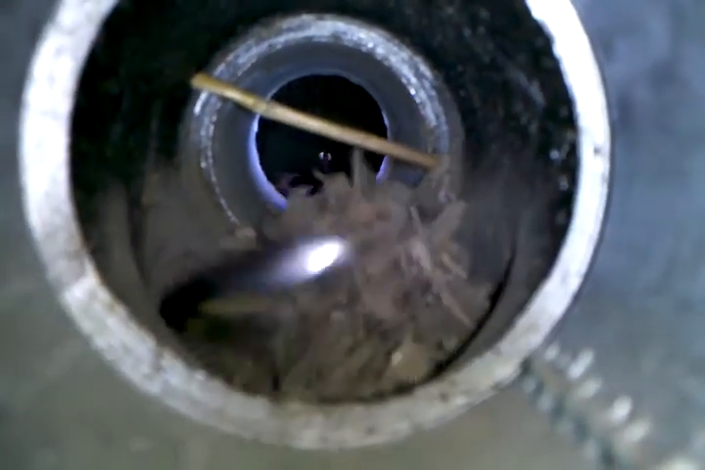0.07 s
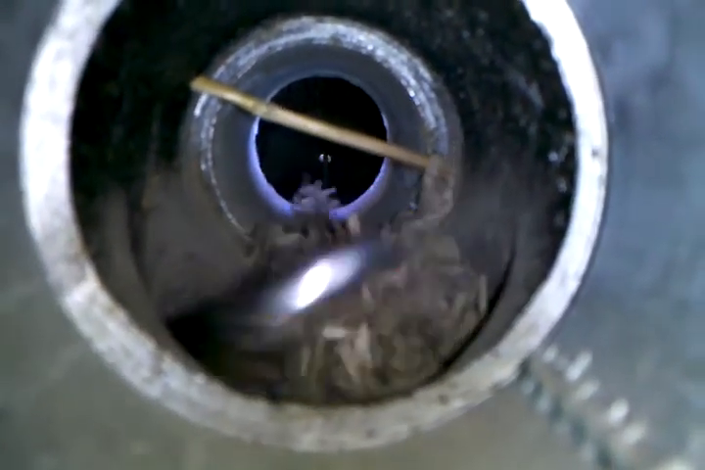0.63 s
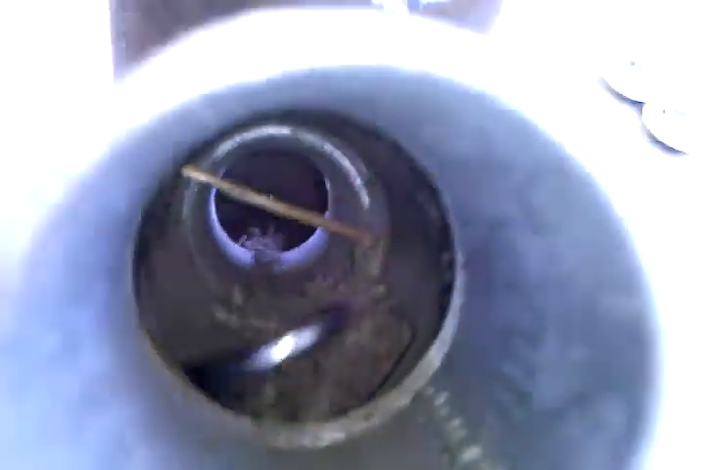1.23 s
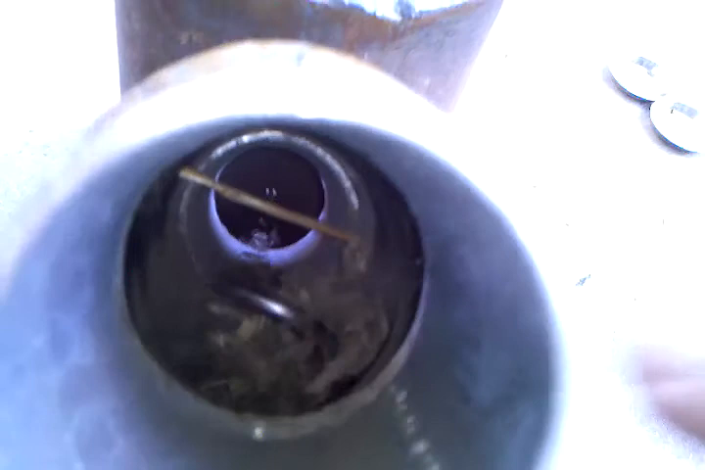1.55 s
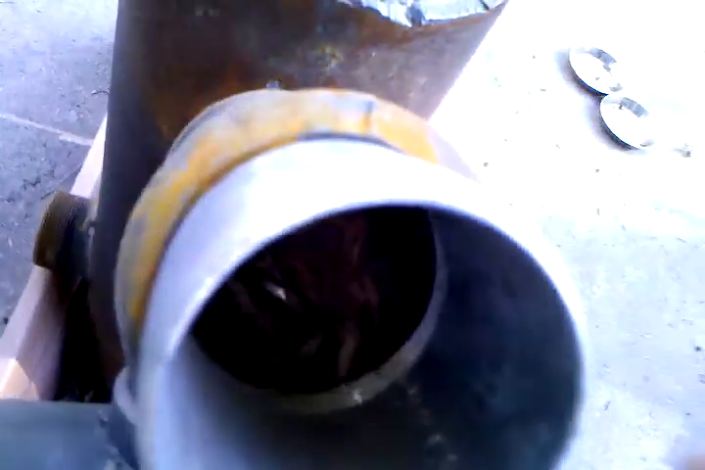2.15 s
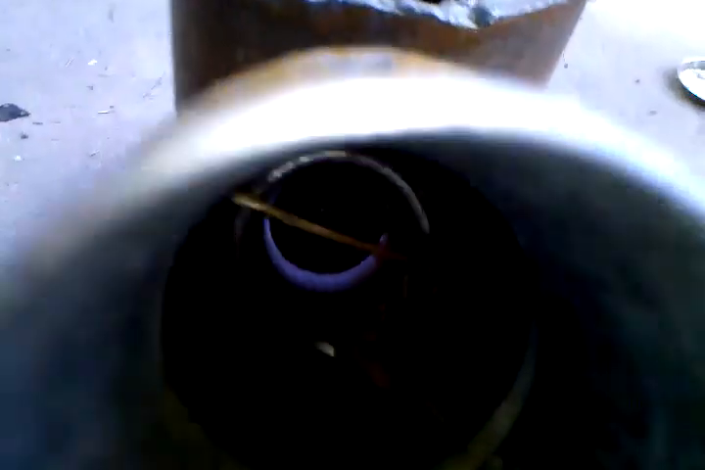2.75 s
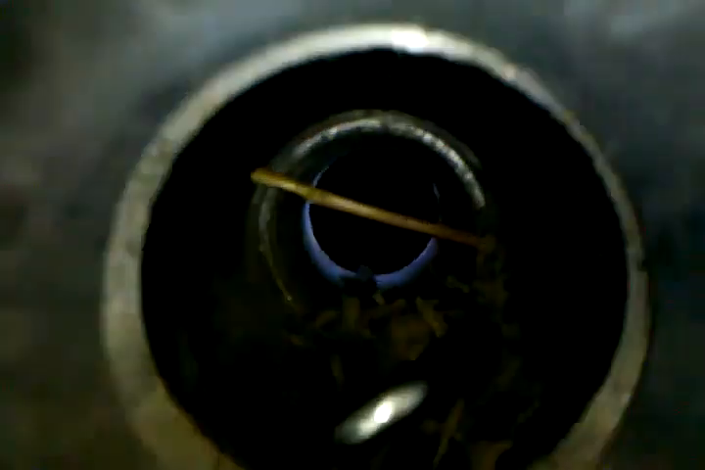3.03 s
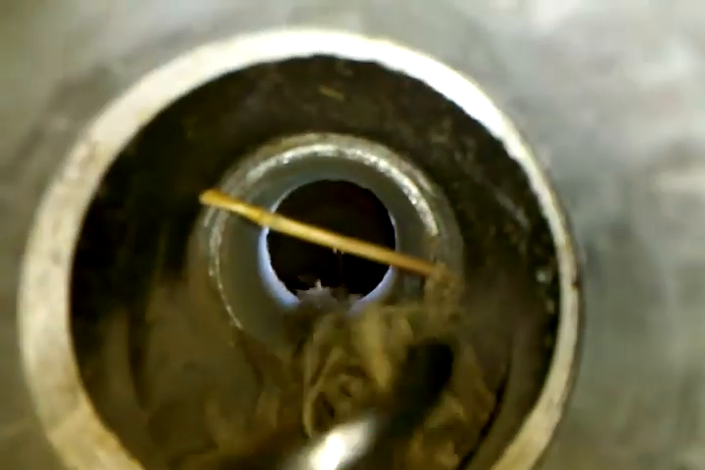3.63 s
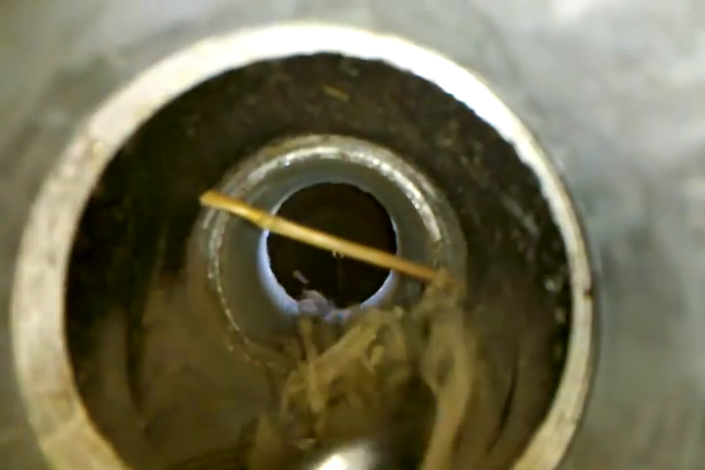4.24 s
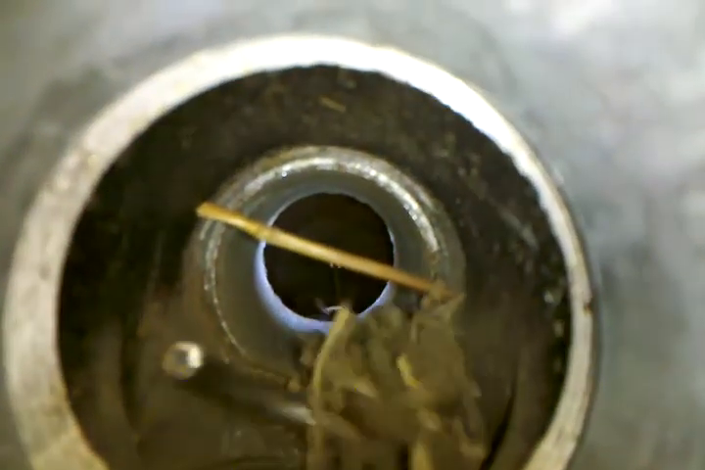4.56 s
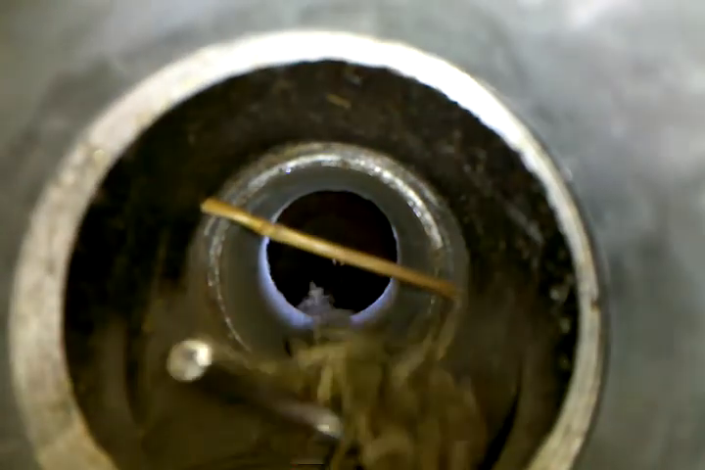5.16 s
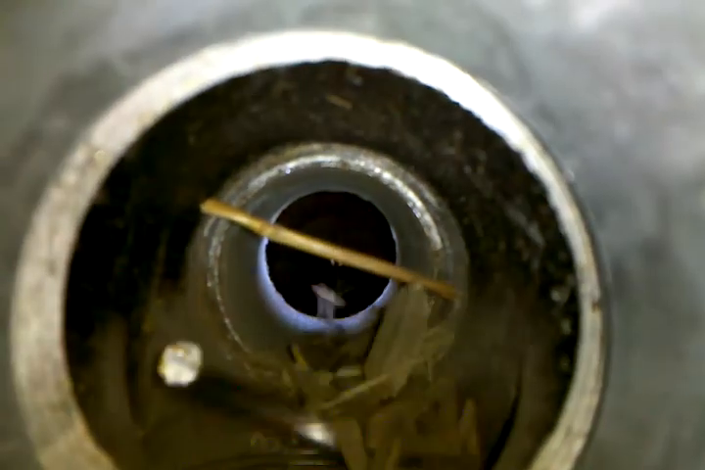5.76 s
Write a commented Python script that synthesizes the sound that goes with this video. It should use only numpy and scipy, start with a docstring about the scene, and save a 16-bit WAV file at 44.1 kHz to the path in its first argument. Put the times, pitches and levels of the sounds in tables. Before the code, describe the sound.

A coil auger turns in a steel pipe for about six seconds, heard through a small microphone at the open end with little high treble. Its hollow rumble and scrape run throughout, swelling gently about every 0.6 seconds, over a very faint motor hum. Wood chips grind, rustle and tink against the wall, and many snap with a short crunch and a brief metallic ring. A strong crack comes at 0.7 seconds, followed by a dull bump. From about 1.5 to 3 seconds the grinding is quieter, with smaller snaps near 2 and 2.4 seconds. After a sharp tick at 3.1 seconds it builds again, with dull knocks near 3.2, 3.9, 4.7 and 5.2 seconds, a cluster of tinks around 4.1 and a tiny rising squeak at 4.6. The loudest ringing snap lands at 5.1 seconds, and another follows at 5.7 as the grinding continues.

```python
"""A coil auger turns in a steel feed pipe, pushing wood chips toward a small microphone at the open end.
The coil rumbles and bumps on the pipe wall, swelling once a turn and sounding the air in the pipe.
The chips grind, rustle and tink on the steel, and one squeaks. Now and then a chip jams and snaps:
a short crunch, and coil and pipe ring. The motor hums faintly behind it all."""
import sys
import numpy as np
from scipy import signal
from scipy.fft import rfft, irfft
from scipy.io import wavfile

SR = 44100
rng = np.random.default_rng(int(sys.argv[2]) if len(sys.argv) > 2 else 0)


def persist_wave(psi):
    """Save psi, clipped to +-1, as 16-bit WAV."""
    counts = np.round(np.clip(psi, -1, 1) * 32767).astype(np.int16)
    wavfile.write(sys.argv[1], SR, np.atleast_2d(counts).T)


N = 259749
TIME = np.arange(N) / SR


# the coil's scraping, weaker while the pipe mouth is farther away: (time [s], relative level [dB])
COIL_LEVEL = [(0.06, -42), (0.33, -45), (0.83, -44.5), (1.32, -43.5), (1.48, -52.5), (1.98, -49),
              (2.09, -54), (3.05, -50.5), (3.27, -42), (3.83, -40), (3.98, -49), (4.2, -40.5), (4.46, -41),
              (4.78, -37), (5.43, -42), (5.8, -40.5)]
# spectra of the low rumble and the hollow scraping at the pipe mouth: (frequency [Hz], gain [dB])
RUMBLE_SPECTRUM = [(25, -50), (55, -26), (76, -13), (105, -13.5), (135, -6), (165, -3.5), (260, 3),
                   (330, -1), (420, -12), (700, -23)]
HOLLOW_SPECTRUM = [(200, -29.5), (320, -20), (400, -0.5), (520, 6), (640, 3.5), (760, -1), (950, -11),
                   (1300, -18.5), (2500, -53)]

def coil_rumble(turn_s=0.621, first_press_s=0.082):
    """The coil judders and scrapes along the wall, pressing hardest once a turn; the air resounds."""
    coil_db = swing(COIL_LEVEL)
    press = np.cos(2 * np.pi * (TIME - first_press_s) / turn_s)
    judder = grains(per_s=1400, spread_db=4) * from_db(2.3 * drift(14))
    scrape = grains(per_s=2500, spread_db=3) * from_db(1.3 * drift(22))
    rumble = rms_one(pipe_air(colour(judder, RUMBLE_SPECTRUM), resonance_db=9))
    hollow = rms_one(pipe_air(colour(scrape, HOLLOW_SPECTRUM), resonance_db=2.5))
    rumble_db = -48 + 1.47 + 0.24 * coil_db + 2 * press
    hollow_db = -43.5 + 0.13 + coil_db + 1.5 * press
    return from_db(rumble_db) * rumble + from_db(hollow_db) * hollow


# the coil's heavier bumps against the pipe: (time [s], relative level [dB], pitch [Hz])
BUMPS = [(0.84, -24.5, 435), (2.645, -29.5, 297), (3.069, -27, 276), (3.232, -21.5, 224),
         (3.899, -23.5, 466), (4.012, -30.5, 376), (4.336, -29.5, 230), (4.688, -20.5, 653),
         (4.754, -27.5, 383), (5.197, -21, 516), (5.848, -27, 400)]
# spectrum of a dull knock inside the pipe: (frequency [Hz], gain [dB])
THUD_SPECTRUM = [(30, -49.5), (70, -36.5), (120, -15.5), (190, -1), (320, -1), (520, 3.5), (720, -4),
                 (950, -14), (1500, -9.5), (3000, -33.5)]

def coil_bumps():
    """The coil drops against the chip-padded wall: a few low cycles and a soft scuff."""
    tone, scuff = np.zeros((2, N))
    t = TIME[:SR // 6]
    faint_bumps = strays(COIL_LEVEL, level_db=-38.5, low_hz=233, high_hz=674, count=8)
    for s, level_db, hz in BUMPS + faint_bumps:
        thump = ring(t, hz, t60=0.054, rise=0.00076)
        add(tone, s, from_db(level_db + 3) * resonate(thump, hz, width=hz))   # padded: near one pitch
        add(scuff, s, from_db(level_db - 10) * burst(t, length=0.0084, t60=0.16, rise=0.0024))
    return tone + pipe_air(colour(scuff, THUD_SPECTRUM), resonance_db=-1)


# flow of chips along the wall, heard as their rustle: (time [s], relative level [dB])
CHIP_FLOW = [(0.12, -47), (0.98, -44.5), (1.46, -50), (2.08, -54), (2.24, -52), (2.9, -51.5), (3.49, -45.5),
             (3.65, -43), (3.82, -51), (4.08, -46.5), (4.25, -40.5), (4.56, -45.5), (4.78, -39.5),
             (4.94, -42), (5.11, -52), (5.32, -44.5), (5.71, -49.5), (5.85, -44.5)]
# spectra of chips crushing and of chips sliding: (frequency [Hz], gain [dB])
GRIND_SPECTRUM = [(500, -25), (950, -8), (1260, -9), (1420, -3.5), (1660, 4), (1900, -0.5), (2150, -5),
                  (2330, -4), (2800, -5.5), (3100, -2.5), (3600, -12), (5000, -20)]
RUSTLE_SPECTRUM = [(1500, -31.5), (2800, -14.5), (3600, -2.5), (4300, 0), (5200, -1), (5900, -2),
                   (6600, 4.5), (7500, -7)]
# modes of the steel pipe: (frequency [Hz])
PIPE_HZ = [680, 1260, 1630, 1925, 2380, 2630, 3050, 3146, 3271, 3353, 3811, 3905, 4018, 4280, 4570, 4764,
           4894, 5470, 5630, 5785, 6195, 6590]
# how each of those modes rings: (t60 [s], gain when struck [dB], gain when rubbed [dB])
PIPE_RING = [(0.11, -5.5, -22.5), (0.026, -12, -6.5), (0.014, -4, -18), (0.05, -12, -11.5),
             (.04, -22, -17.5), (0.071, -6.5, -6), (0.06, -0.5, 1), (0.12, -6, -2), (0.039, 2.5, -9),
             (0.12, -8, -12), (.085, -8.5, -14), (0.056, -13, -18), (0.12, -11, -2.5), (0.087, -4, 1),
             (0.078, -12.5, -18), (0.036, -8, -22.5), (0.047, -8, -17), (0.056, -11.5, -15),
             (0.05, -19.5, -24.5), (0.085, -17.5, -12.5), (0.07, -19, -11.5), (0.18, -19, -19)]
COIL_HZ, COIL_T60_S = 4996, 0.062   # the coil's own ring

def sliding_chips():
    """Chips crush, slide and flick in small clumps; their contacts keep the steel faintly ringing."""
    flow_db = swing(CHIP_FLOW)
    clumps_db = 1.2 * drift(20)
    grind_db = -45.5 + 0.33 * swing(COIL_LEVEL) + 0.22 * flow_db + clumps_db
    rustle_db = -43 + flow_db + clumps_db
    flicks = from_db(3.5) * chip_flicks()
    tinks = chip_tinks()
    grind = (grains(per_s=6000, spread_db=4.5) + 0.35 * flicks) * from_db(grind_db - 2.67)
    rustle = (grains(per_s=9000, spread_db=4) + flicks) * from_db(rustle_db - 2.23)
    rubbing = (grains(per_s=2000, spread_db=0) + flicks) * from_db((grind_db + rustle_db) / 2)
    steel = from_db(-5.5) * resonate(rubbing, COIL_HZ, mode_width(COIL_T60_S))
    for hz, (t60, _, rubbed_db) in zip(PIPE_HZ, PIPE_RING):
        grip = from_db(3.2 * drift(4.5))   # a mode swells as chips slide over its antinodes
        contacts = rubbing * grip + from_db(-5.5) * tinks
        steel += from_db(rubbed_db) * resonate(contacts, hz, mode_width(t60))
    wood = colour(grind, GRIND_SPECTRUM) + colour(rustle, RUSTLE_SPECTRUM) + tinks
    return pipe_wall(wood) + from_db(16) * steel


# chips that jam and snap: (time [s], relative level [dB], length of the break [s],
# thud trim [dB], crunch trim [dB], coil ring trim [dB], chip pitch [Hz])
SNAPS = [(0.0423, -25, .0033, -21, -13, -13, 4550), (0.0852, -27, 0.0047, -16, -1.5, -1, 4950),
         (0.7422, -14, 0.0062, -6, -4, 0, 5450), (0.8325, -25.5, 0.0058, 1, -6.5, -2, 2940),
         (1.3014, -27, 0.0071, -17, -2, 5, 4870), (1.4311, -37.5, 0.0099, 2, -2.5, -3, 3100),
         (1.5424, -32.5, 0.0022, -20, -4, -20, 3450), (2.0163, -24, .0043, -30, -5.5, -19, 3460),
         (2.0403, -27.5, 0.0033, -3.5, -8.5, -16, 4160), (2.0604, -36.5, 0.0077, -3, -5.5, 1, 3250),
         (2.134, -43.5, 0.0023, -21, 4, -10, 4700), (2.382, -35.5, 0.0028, 1.5, -6, -10, 6540),
         (2.4377, -23, 0.0035, -5.5, 0.5, -8, 3060), (2.4618, -44, 0.0063, 15, 16.5, -14, 3240),
         (2.5775, -31, 0.0039, -25, -6.5, -7, 3400), (2.7691, -36.5, 0.0039, 1.5, 2.5, -14, 4000),
         (3.0694, -18, 0.0025, -11.5, -15, -21, 5800), (3.0814, -30, 0.0034, -10, -18, -20, 5200),
         (3.163, -35, .0033, -14, -17, -14, 6070), (3.1802, -23.5, .006, -9, -12.5, -18, 3500),
         (3.2834, -25, 0.00651, -5.5, -5.5, -18, 3300), (3.7778, -25, 0.0088, -3, -0.5, -13, 3950),
         (4.3939, -30, 0.0078, 1, -11, -17, 2920), (4.5146, -21.5, 0.0046, 1, -7.5, -28, 3040),
         (4.565, -25, 0.0056, -6, -10, -3, 3950), (4.8085, -18.5, .0035, -5, -8.5, -29, 4480),
         (5.0868, -8, 0.0084, -13, -7, 2.5, 3240), (5.234, -36.5, .009, 4, -2, 5.5, 5160),
         (5.3657, -35, 0.0033, -4, -1.5, -4, 4360), (5.6333, -38, .0065, -8, -14, -13, 4280),
         (5.6934, -16, 0.0069, -7, -9, -10, 3020), (5.8022, -35.5, .008, 4.5, 0, -14, 4520)]
# spectrum of cracking wood: (frequency [Hz], gain [dB])
CRACK_SPECTRUM = [(1000, -21.5), (2300, -11.5), (3000, -4), (3600, -2), (4400, 1), (5700, 0), (6700, 0.5),
                  (8000, -9.5)]

def chip_snaps(wind_up_s=0.004):
    """A chip breaks with a tick, crack, crunch and thud; the freed coil slaps the pipe and both ring."""
    thud, crunch, crack, steel = np.zeros((4, N))
    t = TIME[:SR // 4]
    touch = 1 + from_db(-60 * t / 0.046)   # the ring is strongest while the parts touch
    for s, level_db, length, thud_db, crunch_db, coil_db, chip_hz in SNAPS:
        fibres = from_db(level_db - 4) * burst(t, length, t60=0.047, rise=0.00025)
        tick = from_db(level_db + 3.5) * burst(t, length=0.00027, t60=0.01, rise=0.0001)
        add(crack, s, tick + fibres + from_db(4.5) * resonate(fibres, chip_hz, width=330))
        add(crunch, s, from_db(level_db + crunch_db - 1) * burst(t, length, t60=0.056, rise=0.00065))
        add(thud, s, from_db(level_db + thud_db - 6) * burst(t, length, t60=0.093, rise=0.0017))
        # a chip that holds longer than wind_up_s winds up the coil for a hard slap
        slap = from_db(level_db - 3) / (1 + (wind_up_s / length) ** 6)
        for hz, (t60, struck_db, _) in zip(PIPE_HZ, PIPE_RING):
            nearness_db = 6.3 * np.exp(-((hz - chip_hz) / 450) ** 2)   # lifts modes near the chip's pitch
            strength = slap * from_db(struck_db + nearness_db + rng.normal(0, 1.5))
            add(steel, s + 0.55 * length, strength * touch * ring(t, hz, t60, rise=0.0016))
        coil_ring = ring(t, COIL_HZ, COIL_T60_S, rise=0.0077)
        add(steel, s + 0.6 * length, from_db(level_db + coil_db + 10.5) * coil_ring)
    low = pipe_air(colour(thud, THUD_SPECTRUM), resonance_db=6.5)
    bright = pipe_wall(colour(crunch, GRIND_SPECTRUM) + colour(crack, CRACK_SPECTRUM))
    return low + bright + steel


# the louder chips that catch on the steel: (time [s], relative level [dB], pitch [Hz])
TINKS = [(0.328, -31.5, 3230), (0.9969, -26, 4280), (1.0455, -30, 4370), (1.1048, -27.5, 2993),
         (1.6878, -30, 4160), (2.3476, -32, 4320), (3.4994, -28, 4340), (4.0982, -22, 4290),
         (4.149, -23, 3140), (4.1868, -27, 3220)]

def chip_tinks():
    """A chip catches on the steel and chatters briefly at its own pitch."""
    out, t = np.zeros(N), TIME[:SR // 8]
    faint_tinks = strays(CHIP_FLOW, level_db=-36.5, low_hz=3130, high_hz=4300, count=8)
    for s, level_db, hz in TINKS + faint_tinks:
        scrape = from_db(level_db - 9.5) * burst(t, length=0.0066, t60=0.081, rise=0.00051)
        add(out, s, from_db(-1.5) * colour(scrape, CRACK_SPECTRUM))
        add(out, s, from_db(14.5) * resonate(scrape, hz, width=45))
    return out


def chip_flicks(per_s=16, t60=0.015):
    """Loose chips flick against the wall: short puffs of uneven strength."""
    hits = rng.uniform(0.3, 1, N) * (rng.random(N) < per_s / SR)
    envelope = signal.lfilter([1], [1, -from_db(-60 / (t60 * SR))], hits + 1e-18)
    return envelope * rng.standard_normal(N)


def chip_squeak(start=4.594, length=0.034, from_hz=5200, to_hz=5950, level_db=-37):
    """A chip slips along the steel with a thin rising squeak."""
    hz = np.interp(TIME, [start, start + length], [from_hz, to_hz]) * (1 + 0.0087 * drift(200))
    swell = np.sin(np.pi * np.clip((TIME - start) / length, 0, 1))
    return from_db(level_db) * swell * np.sin(2 * np.pi * np.cumsum(hz) / SR)


# resonances of the air in the pipe, heard at its mouth: (frequency [Hz], width [Hz], gain [dB])
AIR_MODES = [(204.7, 16.3, -8), (377, 11, -3), (438, 35, -5), (523.5, 30, -6.5), (583, 23, -3),
             (689.6, 14.2, 2.5)]

def pipe_air(x, resonance_db):
    """The air column lifts its own pitches out of a low sound."""
    column = sum(from_db(db) * resonate(x, hz, width) for hz, width, db in AIR_MODES)
    return x + from_db(resonance_db) * column


def pipe_wall(x, lift_db=3, width=55):
    """A sound inside the pipe reaches the mouth lifted at each of the wall's modes."""
    for hz in PIPE_HZ:
        x = x + (from_db(lift_db) - 1) * resonate(x, hz, width)
    return x


def motor_hum(hum_hz=120, level_db=-63):
    """In the background the drive hums at twice the mains frequency."""
    return from_db(level_db + 1.2 * drift(4.3)) * np.sin(2 * np.pi * hum_hz * TIME)


def from_db(db):
    """Decibels to gain."""
    return 10 ** (np.asarray(db) / 20)


def rms_one(x):
    """Scale to rms 1."""
    return x / np.sqrt(np.mean(x ** 2) + 1e-20)


def drift(rate_hz):
    """A smooth random wander of rms about 1."""
    pole = np.exp(-80 * np.pi * rate_hz / SR)
    noise = rng.standard_normal(N // 40 + 2002)   # one value per 40 samples, plus time to settle
    slow = signal.lfilter([1], [1, -2 * pole, pole * pole], noise)[2000:]
    return np.interp(np.arange(N) / 40, np.arange(len(slow)), rms_one(slow))


def swing(curve):
    """A level curve at every sample, in dB around its mean."""
    db = np.interp(TIME, *np.transpose(curve))
    return db - db.mean()


def strays(curve, level_db, low_hz, high_hz, count):
    """Random faint events whose strength follows the curve: (time [s], level [dB], pitch [Hz])."""
    when, pitch = rng.random((count, 2)).T
    s = (np.arange(count) + when) / count * TIME[-1]
    db = level_db + np.interp(s, TIME, swing(curve))
    return list(zip(s, db, low_hz * (high_hz / low_hz) ** pitch))


def grains(per_s, spread_db):
    """Random tiny contacts, their strengths scattered by spread_db; rms 1."""
    sizes = from_db(spread_db * np.minimum(rng.exponential(1, N), 5)) * rng.choice([-1, 1], N)
    return rms_one(sizes * (rng.random(N) < per_s / SR))


def burst(t, length, t60, rise):
    """Noise of a break or scrape: it rises, holds for a moment and dies away in the pipe."""
    envelope = (1 - np.exp(-t / rise)) * from_db(-60 * np.maximum(t - length, 0) / t60)
    return envelope * rng.standard_normal(len(t))


def ring(t, hz, t60, rise):
    """A struck mode swells and then decays."""
    envelope = (1 - np.exp(-t / rise)) ** 2 * from_db(-60 * t / t60)
    return envelope * np.sin(2 * np.pi * (hz * t + rng.random()))


def mode_width(t60):
    """Width in Hz of a mode that falls 60 dB in t60 seconds."""
    return np.log(1000) / (np.pi * t60)


def resonate(x, hz, width):
    """One resonance, width in Hz, gain 1 at its peak."""
    r = np.exp(-np.pi * width / SR)
    feedback = [1, -2 * r * np.cos(2 * np.pi * hz / SR), r * r]
    return signal.lfilter(np.array([1, 0, -1]) * (1 - r * r) / 2, feedback, x + 1e-18)


def colour(x, spectrum, keep_power=True, size=4096):
    """Causal (minimum-phase) filter with the given spectrum."""
    hz, db = np.transpose(spectrum)
    grid = np.maximum(np.arange(size // 2 + 1) * SR / size, 1)
    gain = from_db(np.interp(np.log(grid), np.log(hz), db))
    if keep_power:
        gain = gain / np.sqrt(np.mean(gain ** 2 * (grid < 7000)))
    cepstrum = irfft(np.log(gain))
    cepstrum[1:size // 2] *= 2
    cepstrum[size // 2 + 1:] = 0
    return signal.fftconvolve(x, irfft(np.exp(rfft(cepstrum))))[:len(x)]


def add(out, s, sound):
    """Mix a short sound in at time s."""
    at = int(s * SR)
    out[at:at + len(sound)] += sound[:max(N - at, 0)]


def scene():
    """Coil and chips come out of the pipe mouth together, over the motor's hum; mono."""
    auger = coil_rumble() + sliding_chips() + chip_snaps() + coil_bumps() + chip_squeak()
    return (auger + motor_hum())[None]


# response of the recorder, whose treble ends near 7 kHz: (frequency [Hz], gain [dB])
RECORDER_RESPONSE = [(20, -24), (50, -9), (100, 0.5), (6000, -2), (6800, -3), (7150, -6.5), (7450, -16.5),
                     (7900, -27), (9000, -34.5), (9800, -68)]

def record(dry, cutoff_hz=16500):
    """The recorder rounds the peaks and ends the treble near 7 kHz; the very loudest overload slightly."""
    saturated = 0.71 * np.tanh(dry[0] / 0.78)
    heard = colour(saturated, RECORDER_RESPONSE, keep_power=False)
    rounded = heard / (1 + (heard / 0.69) ** 10) ** (1 / 10)
    lowpass = signal.cheby2(12, 70, cutoff_hz, fs=SR, output="sos")
    return signal.sosfilt(lowpass, rounded)[None]


dry = scene()
out = record(dry)
persist_wave(out)
```